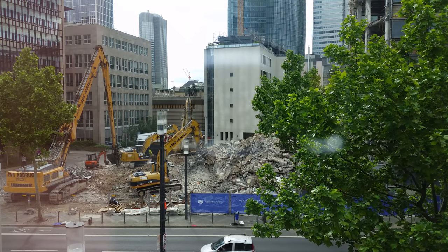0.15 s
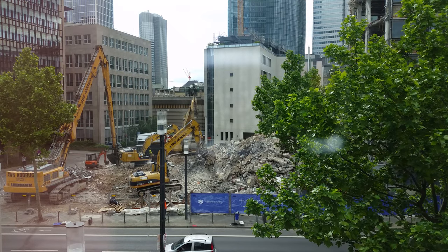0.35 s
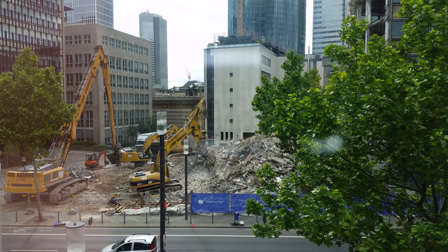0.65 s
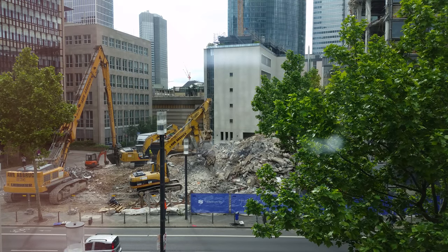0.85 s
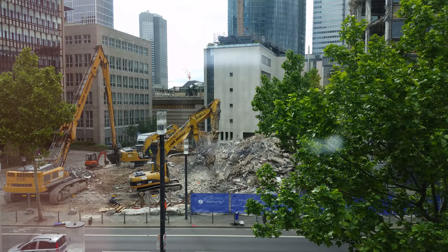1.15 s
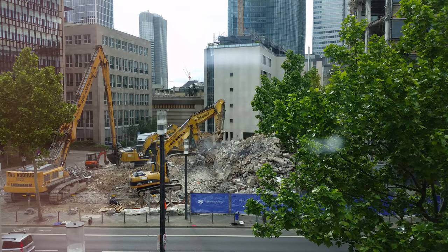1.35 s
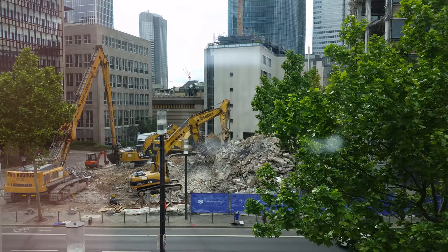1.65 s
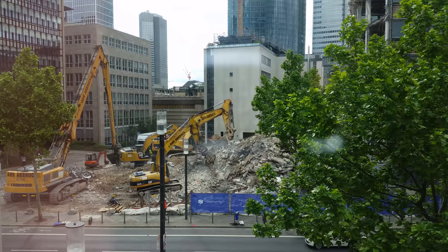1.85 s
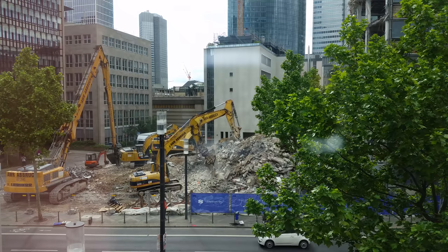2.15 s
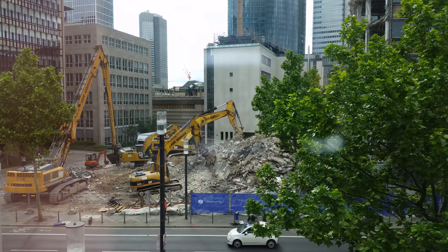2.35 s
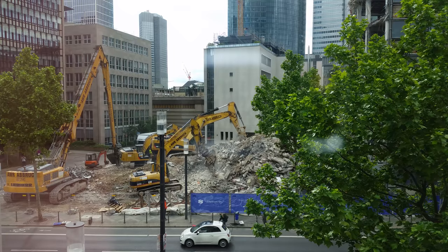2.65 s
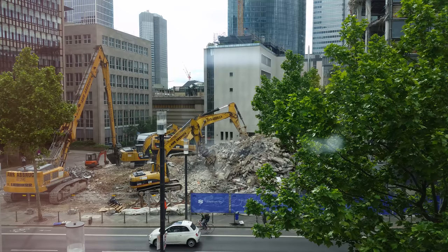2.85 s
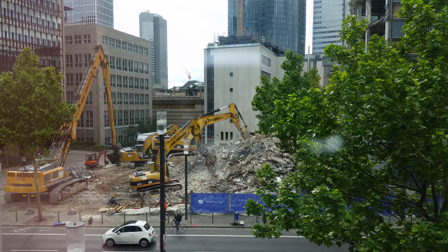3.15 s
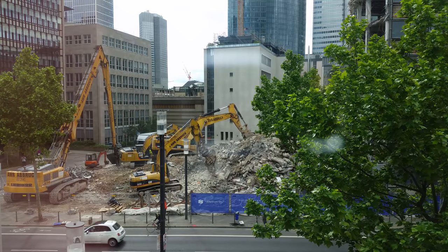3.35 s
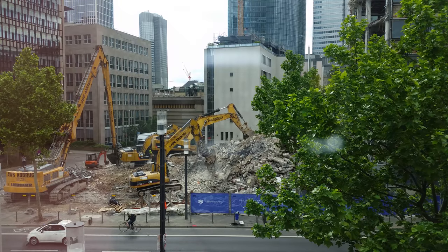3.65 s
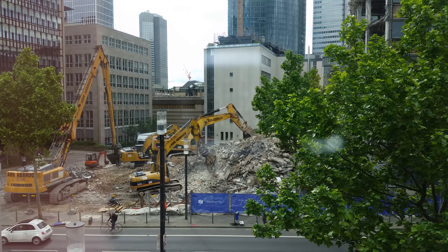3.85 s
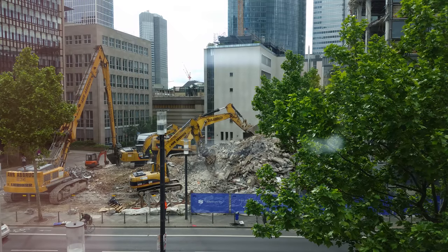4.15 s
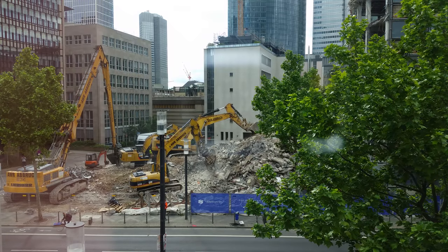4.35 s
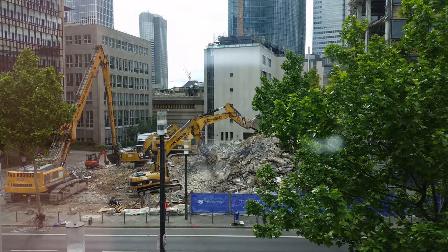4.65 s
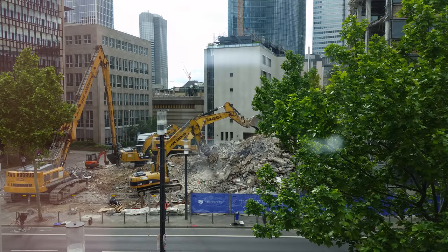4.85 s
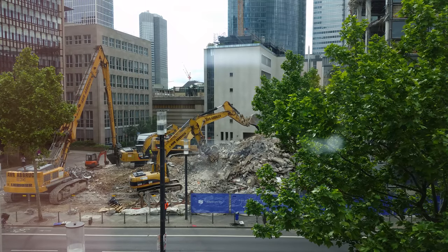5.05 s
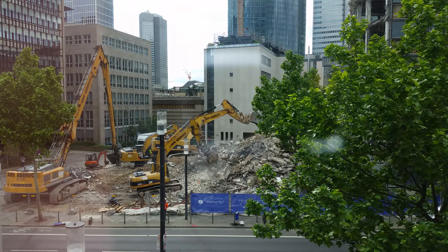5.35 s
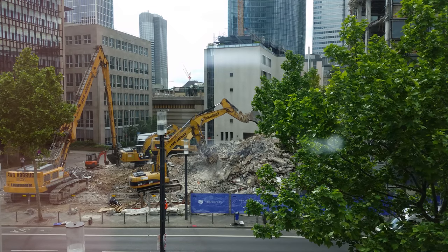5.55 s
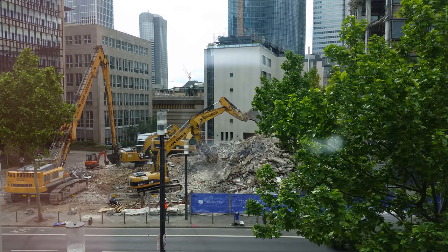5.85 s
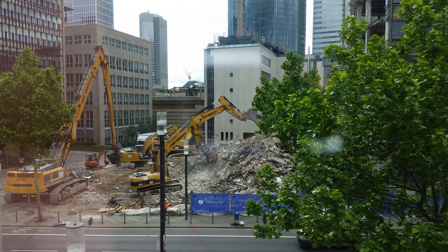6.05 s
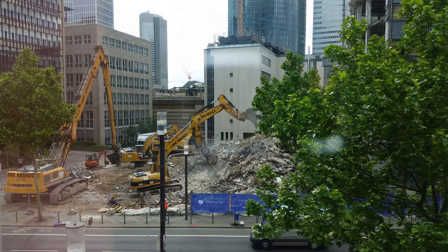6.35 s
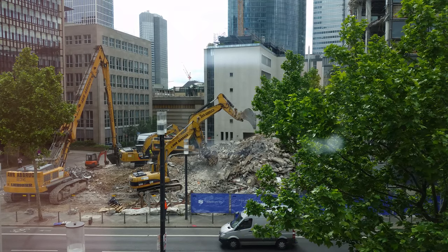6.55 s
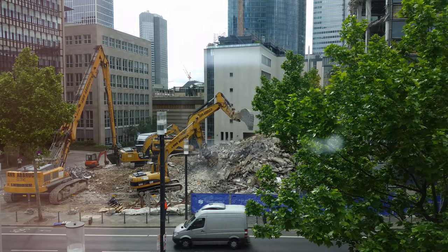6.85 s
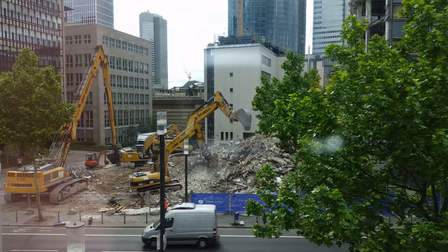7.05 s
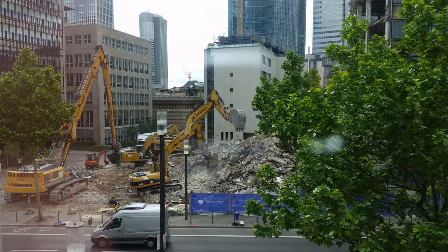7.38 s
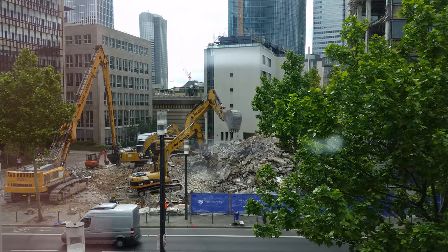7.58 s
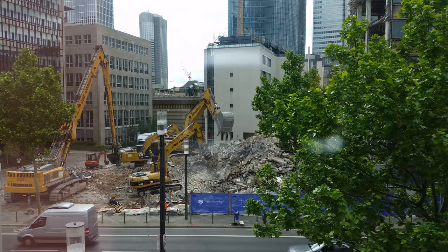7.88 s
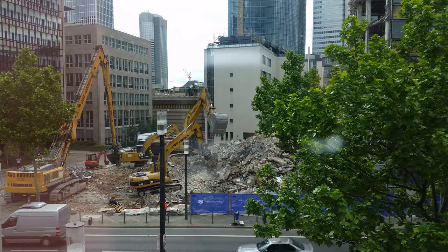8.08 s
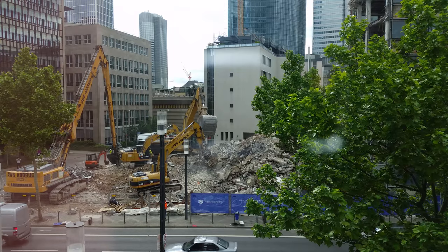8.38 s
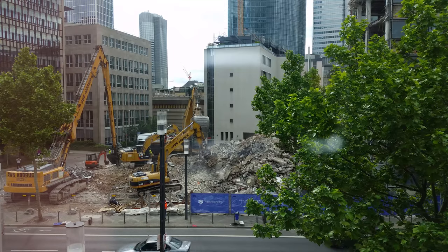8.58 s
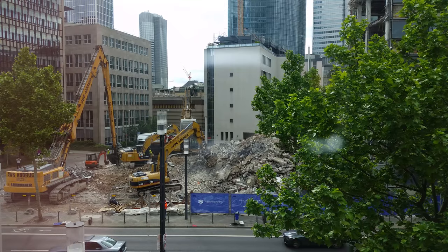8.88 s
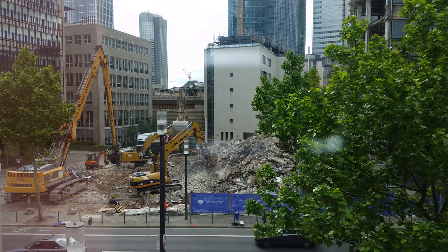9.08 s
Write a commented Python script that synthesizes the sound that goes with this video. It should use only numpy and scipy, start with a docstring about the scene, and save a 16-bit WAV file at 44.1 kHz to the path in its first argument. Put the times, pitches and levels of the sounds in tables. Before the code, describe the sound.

Wide, distant stereo from an upper floor over a city street. Throughout, two diesel excavators throb at low, unlike pitches, beating together and surging irregularly, with fan hum, thin unsteady pump whine, small rubble rattle, low city rumble and faint hiss. A car's tyres are already passing at 0 s, another at 1.6 s, a stronger one around 3.5 s, treads singing faintly downward. Hums and squeals glide from 0.6 s; a thin birdlike whistle arches at 1.1 s. Rubble knocks start near 1.9 s, clustering at 3.0-3.5 s with a slide and scrape. At 4.55 s a loud, sharp electrical pop on the left; everything but the low drones drops and dulls, recovering by about 6 s. A second whistle comes at 4.9 s, knocks at 5.3-5.6 s. From 6 s a van passes with wavering, sinking gear whine, peaking near 6.9 s. Knocks follow around 7 s, then rubble sliding, squeals and hums from 7.8 to 9 s.

```python
"""Diesel excavators work on a demolition site across a city street, heard from an upper floor.
From the start exhaust drones beat and surge over a pump whine, rubble rattle, city rumble and passing tyres.
Squeals and hums glide from 0.6 s, thin whistles arch up at 1.1 and 4.9 s, rubble knocks from 1.9 s, engines swell.
At 4.55 s an electrical step pops in the left channel; all but the low drones turns quiet and dull, then
recovers within about a second and a half. From 6 s a van's gears whine past over further knocks and squeals."""
import sys
import numpy as np
from scipy import signal
from scipy.fft import rfft, irfft
from scipy.io import wavfile

SR = 44100
rng = np.random.default_rng(int(sys.argv[2]) if len(sys.argv) > 2 else 0)


def store_pcm(level_fs):
    """Save levels as 16-bit WAV."""
    pcm = np.round(np.clip(level_fs, -1, 1) * 32767).astype(np.int16)
    wavfile.write(sys.argv[1], SR, np.atleast_2d(pcm).T)


N = 406602
T = np.arange(N) / SR
BINS_HZ = np.fft.rfftfreq(N, 1 / SR)
SIDES = np.array([[1], [-1]])  # left, right

# Working excavator. Each row: time in seconds, firing rate in Hz, firing tone in dB ahead of a trim.
NEAR_FIRING = [(0.0, 89.3, -47), (0.35, 90.6, -45), (0.52, 90.4, -36.5), (0.78, 91, -54),
               (1.15, 88.7, -44.5), (1.55, 88.7, -49.5), (2.2, 88.5, -45.5), (2.52, 88.4, -42),
               (2.87, 90.5, -37.5), (3.2, 90.4, -50), (3.5, 86.6, -35), (3.81, 88.3, -38),
               (4.04, 88.8, -46), (4.42, 89.4, -36), (4.63, 91.5, -48), (4.95, 88.3, -43.5),
               (5.5, 89.8, -46.5), (5.75, 89.6, -39), (5.95, 89.2, -46.5), (6.5, 88.8, -43),
               (6.74, 86.8, -41), (6.88, 89, -37.5), (7.28, 89.2, -39), (7.75, 89.9, -53), (8.4, 89.2, -51),
               (8.85, 88.7, -42.5), (9.22, 87.8, -45)]
# Second excavator, further back. Each row: time in seconds, firing rate in Hz, level in dB ahead of a trim.
SECOND_FIRING = [(0.0, 104.9, -40.5), (0.2, 104.3, -40), (0.8, 105.3, -54.5), (0.95, 106.2, -40),
                 (1.3, 110.2, -48.5), (1.59, 111.7, -38.5), (2.14, 105.9, -44), (2.44, 104.8, -62),
                 (2.59, 106.4, -44), (3.49, 108.2, -55), (3.79, 105.4, -44), (4.49, 104.5, -41),
                 (4.73, 105.5, -52), (6.68, 107, -52.5), (6.93, 104.2, -38.5), (7.72, 106.3, -52),
                 (8.12, 104.5, -43), (9.22, 103.6, -41)]
# Upper orders of the working engine. Each row: multiple of the firing rate, level in dB.
FIRING_ORDERS = [(4, -67), (6, -63.5), (7, -67), (8, -68.5)]
# Pulls on the arm, booming an octave above the firings. Each row: start in seconds, time until release
# in seconds, level in dB.
ARM_PULLS = [(0.087, 0.26, -36.5), (0.698, 0.13, -48), (2.13, 1.03, -40.5), (2.406, 0.14, -36),
             (3.565, 0.52, -35), (4.165, 0.13, -37.5), (4.596, 0.42, -44.5), (5.327, 0.36, -44),
             (5.804, 0.49, -36.5), (5.88, 0.11, -37), (6.465, 0.16, -40.5), (6.68, 0.84, -37),
             (6.95, .25, -37.5), (7.593, 0.2, -41), (7.905, 0.48, -40.5), (8.795, 0.27, -36.5)]
# Swells of the fan hum. Each row: start in seconds, time until release in seconds, level in dB.
FAN_SURGES = [(0.0, 0.35, -54), (1.7, 0.22, -52), (2.02, 0.11, -48), (2.73, 0.072, -51),
              (4.462, 0.24, -45.5), (4.88, 0.14, -45.5), (5.3, 0.19, -49.5), (6.696, 0.09, -46),
              (7.2, 0.087, -48), (7.96, 0.12, -53)]
# Hydraulic pump. Each row: multiple of the piston rate, level in dB ahead of wander and echo.
PISTON_ORDERS = [(2, -56.5), (6, -70), (8, -63.5), (9, -73), (14, -83)]

# Relative noise spectra of tyre roar (also block clatter), tread fizz, body rumble, city and hiss.
# Each row: frequency in Hz, density in dB per Hz.
ROAR_SPECTRUM = [(500, -17.5), (800, -8), (920, -3), (1050, 2.5), (1180, 0), (1380, 3), (1600, -5.5),
                 (1750, -8.5), (1900, -20.5), (2600, -67.5)]
FIZZ_SPECTRUM = [(1300, -27), (1850, 3), (2400, 1), (2750, -5.5), (3050, -13.5), (3600, -11), (5500, -45)]
RUMBLE_SPECTRUM = [(130, -13.5), (200, 3), (245, 6.5), (305, 8.5), (345, 6), (390, 1.5), (480, -0.5),
                   (550, 1.5), (680, -4), (850, -3), (1200, -13.5), (2500, -54.5)]
CITY_SPECTRUM = [(10, -23), (20, -12.5), (28, 1.5), (60, -3.5), (95, 5), (135, -0.5), (160, 5), (205, -1.5),
                 (240, -15), (400, -24.5), (1500, -63.5)]
HISS_SPECTRUM = [(1500, 7), (3000, 8), (3600, 11), (4400, 6.5), (5200, 1.5), (6200, -15.5), (9000, -23),
                 (10500, -8.5), (11500, 1), (12300, 6), (14500, 2.5)]
# Balance of the two microphones in noise. Each row: frequency in Hz, left minus right in dB.
MIC_BALANCE = [(30, -1), (90, -3), (180, 2), (300, 1.5), (600, 1.5), (2000, 3.5), (4000, -1), (12000, -0.1)]
# Relation of the microphones. Each row: frequency in Hz, likeness from 0 to 1, lead of the left in radians.
MIC_LIKENESS = [(30, 0.98, 0.5), (99, 0.98, 0.2), (179, 0.69, .5), (233, 0.4, 0.5), (296, 0.77, 0.7),
                (420, 0.76, 0), (624, 0.25, 0.1), (800, 0.35, 0.2), (835, 0.28, -2.5), (1190, 0.23, -2.5),
                (1370, 0.46, -1.45), (1670, 0.53, 0), (1840, 0.19, -3.5), (1990, 0.39, -2.5),
                (2310, 0.21, -5), (2840, 0.24, -5.5), (3600, 0.17, -7), (4380, 0.16, -10), (5500, .05, -10),
                (14000, 0.18, -9.5)]

# Vehicles going by. Each row: time of the loudest point in seconds, tyre roar in dB, tread fizz
# and body rumble in dB relative to the roar.
VEHICLES = [(0.0, -53.5, -12.5, 2), (1.6, -58.5, -12, -0.5), (3.5, -51.5, -16.5, -10.5),
            (6.9, -56.5, -13, -6)]
# Singing treads. Each row: start in seconds, length in seconds, start and end pitch in Hz, level in dB.
TREAD_GLIDES = [(-0.5, 0.99, 3315, 3020, -73), (0.401, 0.7, 2500, 2290, -71),
                (1.199, .95, 3246, 3190, -75.5), (2.951, 1.33, 2537, 1960, -66.5)]
# Engines easing off as they pass. Each row: start in seconds, firing rate there in Hz, level in dB.
EASING_ENGINES = [(2.15, 74.26, -48), (7.499, 74.67, -49)]

# Rubble and steel knocks. Each row: start in seconds, level in dB ahead of the echo, spectral tilt
# in dB per octave, 60 dB decay time in seconds.
RUBBLE_KNOCKS = [(1.855, -47, 3, 0.97), (2.093, -46.5, -4, 0.099), (3.02, -43.5, 2, .05),
                 (3.065, -44, -1, 0.045), (3.215, -53.5, 2.5, 0.24), (3.347, -42, 0.5, 0.13),
                 (3.395, -35.5, 2, 0.037), (3.428, -42.5, 2, .05), (3.462, -43, 2, .08),
                 (3.521, -42.5, 3, .07), (5.323, -40, 0, .05), (5.386, -51, 5, 0.11),
                 (5.449, -44, 0.5, 0.05), (5.527, -45, 2, 0.056), (5.572, -48, 5, .1),
                 (6.85, -46.5, 6, 0.1), (6.921, -44.5, 0, 0.13), (7.011, -37, -1.5, 0.04),
                 (7.051, -44, -2.5, 0.064), (7.93, -50.5, -9.5, 0.85), (8.121, -51, 13, 0.15),
                 (8.87, -53, 10, 0.5)]
# Bucket resonances, each applied twice. Each row: frequency in Hz, width of one in Hz, level in dB.
BUCKET_MODES = [(552, 48, -2.5), (740, 89, 0), (1019, 150, 3.5), (1276, 160, 3), (1380, 90, 6),
                (1516, 230, -5.5), (2330, 260, -20), (3430, 320, -30.5)]
# Rubble sliding over the bucket. Each row: start in seconds, time until release in seconds,
# level in dB ahead of the echo.
RUBBLE_SLIDES = [(3.282, .15, -59.5), (7.788, 0.17, -52)]
# Squeals, scrapes, low hums and breathy high hiss. Each row: start in seconds, length in seconds,
# start and end pitch in Hz, level in dB ahead of the echo, rasp as a share of the pitch.
SQUEAL_AND_HUM_GLIDES = [(0.96, 0.62, 346.7, 339, -46.5, .012), (1.548, 0.49, 346, 342, -54.5, 0.015),
                         (1.0, 0.29, 442, 450, -54, 0.03), (0.56, 1.3, 612, 580, -63.5, .012),
                         (1.66, 0.24, 1057, 1130, -51, .02), (3.1, 0.14, 2300, 2290, -60.5, .015),
                         (3.282, 0.27, 1390, 1370, -50.5, 0.012), (5.53, 0.15, 456, 420, -59.5, .02),
                         (5.81, .25, 298.4, 302, -55, .01), (5.9, 0.43, 668, 697, -60, .015),
                         (5.899, .5, 580, 566, -60.5, .015), (6.81, .025, 2546, 2690, -63, .008),
                         (7.33, 0.44, 782, 824, -57, .012), (7.54, .8, 299, 304.5, -54, .015),
                         (1.45, .5, 4750, 4300, -80, .08), (1.15, .3, 4400, 4800, -82, .07),
                         (8.22, .48, 4380, 4350, -76, .07), (2.4, 1.2, 336, 332, -57, 0.018),
                         (7.4, .8, 600, 520, -54.5, .14), (7.86, 0.14, 712, 730, -51, .012),
                         (7.9, 0.11, 540, 542, -52.5, 0.025), (7.89, 0.12, 1160, 1258, -48, .006),
                         (7.928, .3, 1352, 1364, -54.5, .012), (7.922, .08, 1020, 1032, -56, .005),
                         (7.99, 0.14, 1075, 890, -53.5, .006), (8.53, 0.18, 299.6, 297.6, -48, .008),
                         (8.81, .25, 353.3, 337.5, -55, .01)]
# Distant whistles. Each row: start in seconds, length in seconds, top pitch in Hz,
# level in dB ahead of shaping and echo, rasp as a share of the pitch.
WHISTLE_ARCHES = [(1.148, .72, 5080, -80, .02), (4.92, .73, 4900, -80, .014)]

FAINT_DRONE_HZ, FAINT_DRONE_DB = 204.5, -55  # steady, near twice the second excavator's firing rate
SURGE_ATTACK_S, SURGE_RELEASE_S = 0.064, 0.1
IDLE_BOOM_DB, IDLE_WANDER_DB = -51.5, 2  # between pulls
FAN_BLADE_HZ, FAN_DB, FAN_WANDER_DB = 278.4, -55.5, 2
PISTON_HZ = 174
SPEED_M_S, LANE_DISTANCE_M = 14.55, 11.7
FAR_ROAR_DB, FAR_FIZZ_DB = -61.5, -76.5  # tyres further along the street
FAR_RUMBLE_DB, CITY_DB, HISS_DB = -53.5, -43, -74
TYRE_LEAN_DB = 6.5  # left minus right
TREAD_HALF_WIDTH_HZ = 340
CRUSH_S, BLOW_DB = .002, 2  # build-up of the crunch; peak of first contact ahead of the knock's level
SLIDE_ATTACK_S, SLIDE_RELEASE_S = 0.1, 0.31
WHISTLE_FOOT_HZ, WHISTLE_SKEW = 3950, .85  # end pitches; a skew under 1 brings the top early
WHISTLE_THIN_DB, WHISTLE_GROW_DB = 11.5, 2.5  # fainter at the top, stronger towards the end
NOTE_ATTACK_S, NOTE_HOLD_S, NOTE_RELEASE_S = 0.35, .7, 0.79
SLOWING_HZ_PER_S = 8
POP_S, POP_CUT_HZ = 4.55334, 69
DIP_DROP_DB, DIP_SINK_DB_PER_S, DIP_HOLD_S, DIP_RECOVER_S = 3.5, 6, 0.77, 0.24
TREBLE_SINK_DB_PER_S, TREBLE_HOLD_S, TREBLE_RECOVER_S = 12, 0.74, 0.48  # on top of the dip
WHINE_START_S, WHINE_HOLD_S, WHINE_ATTACK_S, WHINE_RELEASE_S = 6.05, 1.26, 0.66, 0.2
WHINE_HZ, WHINE_SINK_HZ_PER_S, WHINE_DB = 1072, 50, -56.5
TOP_HZ, FADE_S = 14600, .004


def undb(db):
    """Decibels to gain."""
    return 10 ** (np.asarray(db) / 20)


def unit(x):
    """Scale to an rms of one."""
    return x / np.sqrt(np.mean(x ** 2))


def curves(rows):
    """The columns of a time table, one value a sample."""
    s, *columns = np.transpose(rows)
    return [np.interp(T, s, column) for column in columns]


def across(points):
    """A frequency table, one value a bin, interpolated over log frequency."""
    hz, value = np.transpose(points)
    return np.interp(np.log(BINS_HZ + 1), np.log(hz), value)


def pan(db):
    """Left and right gains for a level difference."""
    return undb(SIDES * db / 2)


def turn(hz):
    """Phase of something that repeats at hz."""
    return 2 * np.pi * np.cumsum(hz) / SR


def walk(rate_hz):
    """Smooth chance with a spread of one, changing about rate_hz times a second."""
    size = 8192
    hz = np.fft.rfftfreq(size, T[-1] / size)
    lowpass = np.exp(-.5 * (hz / rate_hz) ** 2)
    slow = unit(irfft(rfft(rng.standard_normal(size)) * lowpass))
    return np.interp(T, np.linspace(0, T[-1], size), slow)


def swell(start_s, hold_s, attack_s, release_s):
    """A linear rise, a hold until hold_s after the start, then exponential decay."""
    t = T - start_s
    return np.clip(t / attack_s, 0, 1) * np.exp(-np.maximum(t - hold_s, 0) / release_s)


def arch(start_s, length_s):
    """An envelope that rises and falls once."""
    return np.sqrt(np.abs(np.sin(np.pi * np.clip((T - start_s) / length_s, 0, 1))))


def surges(rest_db, rows):
    """Strength of a drone: a resting level plus, in power, a swell for every row."""
    power = undb(rest_db) ** 2
    for start_s, hold_s, db in rows:
        power = power + (undb(db) * swell(start_s, hold_s, SURGE_ATTACK_S, SURGE_RELEASE_S)) ** 2
    return np.sqrt(power)


def spaced(pair):
    """Spectra of both sides to sound, phase-shifted as spaced microphones hear it."""
    lead = across([(hz, radians) for hz, _, radians in MIC_LIKENESS])
    return irfft(pair * np.exp(.5j * SIDES * lead), N)


def wash(spectrum):
    """Diffuse stereo noise: a mid and a side part mixed to the microphones' likeness at each frequency."""
    mid, side = rfft(rng.standard_normal((2, N)))
    alike = np.clip(across([(hz, share) for hz, share, _ in MIC_LIKENESS]), -1, 1)
    pair = np.sqrt(1 + alike) * mid + SIDES * np.sqrt(1 - alike) * side
    x = spaced(pair * undb(across(spectrum)) * pan(across(MIC_BALANCE)))
    return x / x.mean(axis=0).std()


def drone(phase, flutter, lean_db, lead_rad):
    """A tone blurred by its many paths between the buildings; the left side leads by lead_rad."""
    blur = 1 + flutter * (walk(11) + 1j * walk(7))
    strength = np.sqrt(2) * unit(np.abs(blur))
    return strength * np.cos(phase + np.angle(blur) + SIDES * lead_rad / 2) * pan(lean_db)


def facades(x, t60_s, direct, wet):
    """Direct sound plus a dense echo from the house fronts, different on each side."""
    t = T[:SR]
    tail = rng.standard_normal((2, SR)) * undb(-60 * t / t60_s) * (t > .015)
    tail /= np.sqrt(np.sum(tail ** 2, axis=1, keepdims=True))
    return direct * x + wet * signal.fftconvolve(x[None], tail, axes=1)[:, :N]


def exhausts():
    """Diesel firing tones at unlike rates throb together; arm pulls boom at twice the near firing rate."""
    near_hz, near_db = curves(NEAR_FIRING)
    second_hz, second_db = curves(SECOND_FIRING)
    near = turn(near_hz)
    boom = surges(IDLE_BOOM_DB + IDLE_WANDER_DB * walk(3.1), ARM_PULLS)
    faint = turn(FAINT_DRONE_HZ * (1 + .006 * walk(2)))
    out = undb(near_db - 1.8) * drone(near, flutter=0.068, lean_db=-1.5, lead_rad=0.14)
    out += boom * drone(2 * near, flutter=0.07, lean_db=0.5, lead_rad=0.63)
    out += undb(second_db + 1.27) * drone(turn(second_hz), flutter=0.31, lean_db=-1.5, lead_rad=0.12)
    out += undb(FAINT_DRONE_DB) * drone(faint, flutter=0.5, lean_db=3, lead_rad=0.94)
    return out


def block_clatter():
    """The nearer engine block: noise pulsing once a firing, plus upper firing orders."""
    firing = turn(curves(NEAR_FIRING)[0])
    out = undb(-63.5) * wash(ROAR_SPECTRUM) * (1 + 0.55 * np.cos(firing))
    for order, db in FIRING_ORDERS:
        out += undb(db) * drone(order * firing, flutter=0.7, lean_db=-1, lead_rad=1.7)
    return out


def fan():
    """The cooling fan hums at its blade rate and swells now and then."""
    strength = surges(FAN_DB + FAN_WANDER_DB * walk(7.1), FAN_SURGES)
    blades = turn(FAN_BLADE_HZ * (1 + .005 * walk(4)))
    return strength * drone(blades, flutter=0.42, lean_db=2, lead_rad=0.64)


def pump():
    """The hydraulic pump whines thinly in a few piston orders, its speed unsteady."""
    shaft = turn(PISTON_HZ * (1 + .008 * walk(12)))
    whine = sum(undb(db + 1.7 * walk(4)) * np.sin(order * shaft) for order, db in PISTON_ORDERS)
    return facades(whine, t60_s=0.53, direct=0.23, wet=0.31) * pan(1.8)


def city():
    """Low city rumble: bass noise with a wandering level."""
    return wash(CITY_SPECTRUM) * undb(CITY_DB + walk(3.1))


def hiss():
    """Faint treble noise."""
    return undb(HISS_DB) * wash(HISS_SPECTRUM)


def passing(far_db, near_db):
    """Strength of a traffic noise: inverse-distance passes added in power to those further off."""
    power = undb(far_db) ** 2
    for (pass_s, *_), db in zip(VEHICLES, near_db):
        distance_m = np.hypot(LANE_DISTANCE_M, SPEED_M_S * (T - pass_s))
        power = power + (undb(db) * LANE_DISTANCE_M / distance_m) ** 2
    return np.sqrt(power)


def tyres():
    """Tyres roar and fizz and bodies rumble as each vehicle goes by."""
    _, roar_db, fizz_db, rumble_db = np.transpose(VEHICLES)
    roar = wash(ROAR_SPECTRUM) * passing(FAR_ROAR_DB, roar_db) * undb(0.57 * walk(22)) * pan(TYRE_LEAN_DB)
    fizz = wash(FIZZ_SPECTRUM) * passing(FAR_FIZZ_DB, roar_db + fizz_db) * undb(0.75 * walk(11))
    rumble = wash(RUMBLE_SPECTRUM) * passing(FAR_RUMBLE_DB, roar_db + rumble_db) * undb(0.78 * walk(5.5))
    return roar + fizz + rumble


def treads():
    """Tyre treads sing: low-passed noise on two quadrature carriers makes a band that sinks."""
    low = signal.butter(2, TREAD_HALF_WIDTH_HZ, fs=SR, output="sos")
    out = np.zeros((2, N))
    for start_s, length_s, start_hz, end_hz, db in TREAD_GLIDES:
        phase = turn(np.interp(T, [start_s, start_s + length_s], [start_hz, end_hz]))
        a, b = unit(signal.sosfilt(low, rng.standard_normal((2, 2, N))))
        band = a * np.cos(phase) + b * np.sin(phase)
        out += undb(db) * arch(start_s, length_s) * band
    return out * pan(3.5)


def knocks(modes):
    """Concrete strikes the bucket: a blow rings its modes, then a crunch builds up as the concrete crumbles."""
    size = SR // 2
    t, hz = T[:size], np.fft.rfftfreq(size, 1 / SR)
    ring = np.interp(hz, BINS_HZ, modes)
    crush = 1 - np.exp(-(t / CRUSH_S) ** 2)
    octaves = np.log2(np.clip(hz, 300, 4000) / 1200)
    out = np.zeros(N + size)
    for start_s, db, tilt_db, t60_s in RUBBLE_KNOCKS:
        colour = ring * undb(tilt_db * octaves)
        crunch = unit(irfft(rfft(rng.standard_normal(size)) * colour, size))
        blow = irfft(colour, size)
        blow *= undb(BLOW_DB) / np.abs(blow).max()
        start = int(start_s * SR)
        out[start:start + size] += (blow + 0.82 * crunch * crush) * undb(db - 60 * t / t60_s)
    return out[:N]


def rubble():
    """Chunks knock and slide on the bucket, small pieces keep rattling; all excite the bucket's modes."""
    modes = sum(undb(db) / (1 + 2j * (BINS_HZ - hz) / width) ** 2 for hz, width, db in BUCKET_MODES)
    modes = modes / (1 + (BINS_HZ / 4500) ** 6)  # distance takes the top off
    struck = knocks(modes)
    pieces = (rng.random(N) < 45 / SR) * undb(2 * rng.exponential(size=N).clip(0, 2))  # 45 a second
    rattle = unit(irfft(rfft(pieces) * modes, N))
    flow = sum(undb(db) * swell(start_s, hold_s, SLIDE_ATTACK_S, SLIDE_RELEASE_S)
               for start_s, hold_s, db in RUBBLE_SLIDES)
    slide = flow * unit(irfft(rfft(rng.standard_normal(N)) * modes, N))
    return facades(struck + slide + undb(-62) * rattle, t60_s=0.6, direct=0.83, wet=0.18) * pan(2.4)


def squeals_and_hums():
    """Squeals, scrapes, low hums and breathy high hiss: glides with jittered pitch and level, smeared by echo."""
    out = np.zeros(N)
    pitch_jitter, level_jitter = walk(120), unit(undb(2.6 * walk(23)))
    for start_s, length_s, start_hz, end_hz, db, rasp in SQUEAL_AND_HUM_GLIDES:
        on = (T > start_s) & (T < start_s + length_s)
        along = (T[on] - start_s) / length_s
        hz = (start_hz + (end_hz - start_hz) * along) * (1 + rasp * pitch_jitter[on])
        strength = undb(db) * unit(level_jitter[on]) * np.sqrt(np.sin(np.pi * along))
        out[on] += strength * np.sin(turn(hz))
    return spaced(rfft(facades(out, t60_s=0.65, direct=0.88, wet=0.4))) * pan(3.4)


def whistles():
    """A thin far-off whistle, perhaps a bird, arches up and down in pitch, broken and faintest at its top."""
    out = np.zeros(N)
    waver, broken = walk(90), unit(undb(4.5 * walk(20)))
    for start_s, length_s, top_hz, db, rasp in WHISTLE_ARCHES:
        on = (T > start_s) & (T < start_s + length_s)
        along = (T[on] - start_s) / length_s
        height = np.sin(np.pi * along ** WHISTLE_SKEW)
        hz = (WHISTLE_FOOT_HZ + (top_hz - WHISTLE_FOOT_HZ) * height) * (1 + rasp * waver[on])
        shaped_db = db - WHISTLE_THIN_DB * height ** 4 + WHISTLE_GROW_DB * along
        strength = undb(shaped_db) * np.sin(np.pi * along) ** .25
        out[on] += strength * unit(broken[on]) * np.sin(turn(hz))
    return facades(out, t60_s=0.45, direct=0.82, wet=0.7) * pan(1)


def engine_notes():
    """Each passing engine swells, then fades while its firing rate sinks."""
    out = np.zeros((2, N))
    for start_s, hz, db in EASING_ENGINES:
        firing = turn(hz - SLOWING_HZ_PER_S * (T - start_s))
        strength = undb(db) * swell(start_s, NOTE_HOLD_S, NOTE_ATTACK_S, NOTE_RELEASE_S)
        out += strength * drone(firing, flutter=0.18, lean_db=-0.5, lead_rad=0.12)
    return out


def pop(peak, cut_hz, damping, rise_s, tick_db):
    """An electrical step, left only: a jump with a faint tick, an undershoot through the bass cut, then rest."""
    t = np.maximum(T - POP_S, 0)
    angle = 2 * np.pi * cut_hz * t
    rise = 1 - np.exp(-(t / rise_s) ** 2)
    step = rise * np.exp(-damping * angle) * (np.cos(angle) - damping * np.sin(angle))
    edge = np.diff(t > 0, prepend=False).astype(float)
    tick = signal.sosfilt(signal.butter(2, 11500, "high", fs=SR, output="sos"), edge)
    rounded = signal.sosfilt(signal.butter(2, 7500, fs=SR, output="sos"), step)
    return np.array([peak * rounded + undb(tick_db) * tick, np.zeros(N)])


def sag(drop_db, sink_db_per_s, hold_s, recover_s):
    """Gain after the pop: a drop, a steady sinking for hold_s, then an exponential return in dB."""
    t = T - POP_S
    loss_db = (t > 0) * (drop_db + sink_db_per_s * np.minimum(t, hold_s))
    return undb(-loss_db * np.exp(-np.maximum(t - hold_s, 0) / recover_s))


def dip(x):
    """After the pop the level sags and the treble sags further."""
    whole = sag(DIP_DROP_DB, DIP_SINK_DB_PER_S, DIP_HOLD_S, DIP_RECOVER_S)
    top = sag(0, TREBLE_SINK_DB_PER_S, TREBLE_HOLD_S, TREBLE_RECOVER_S)
    treble = signal.sosfiltfilt(signal.butter(6, 1800, "high", fs=SR, output="sos"), x)
    return whole * (x + (top - 1) * treble)


def van_whine():
    """The van's gears sing a rough, broken note that wavers and sinks as it goes by."""
    hz = (WHINE_HZ - WHINE_SINK_HZ_PER_S * (T - WHINE_START_S)) * (1 + .024 * walk(45))
    strength = undb(WHINE_DB) * swell(WHINE_START_S, WHINE_HOLD_S, WHINE_ATTACK_S, WHINE_RELEASE_S)
    broken = unit(undb(1.9 * walk(9.8)))
    return strength * broken * drone(turn(hz), flutter=2.6, lean_db=6.5, lead_rad=-1.7)


def scene():
    """Site and street under the dip, the undipped low drones, and the pop."""
    drones = exhausts()
    site = block_clatter() + fan() + pump() + rubble() + squeals_and_hums()
    street = city() + tyres() + treads() + engine_notes() + van_whine()
    around = site + street + whistles() + hiss()
    return drones + dip(around) + pop(peak=1.47, cut_hz=POP_CUT_HZ, damping=0.92, rise_s=0.00021, tick_db=-17.5)


def record(dry):
    """A soft start and end, then the recorder's steep treble cut."""
    fade = np.minimum(np.minimum(T, T[-1] - T) / FADE_S, 1)
    return signal.sosfilt(signal.ellip(10, .2, 80, TOP_HZ, fs=SR, output="sos"), dry * fade)


dry = scene()
out = record(dry)
store_pcm(out)
```